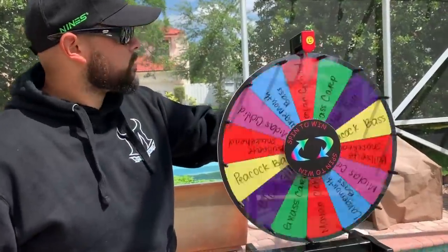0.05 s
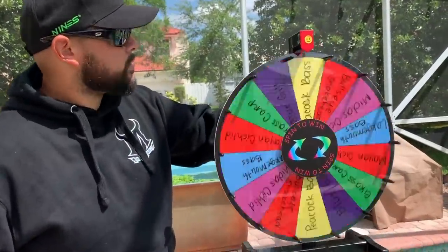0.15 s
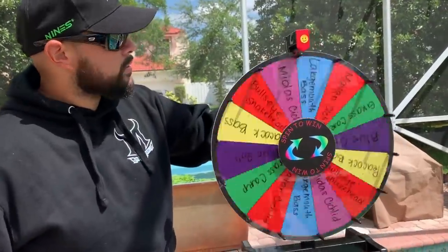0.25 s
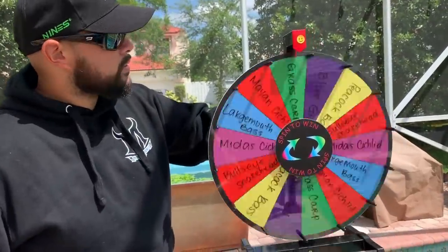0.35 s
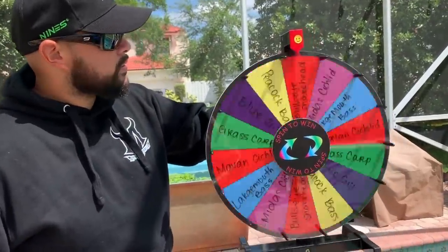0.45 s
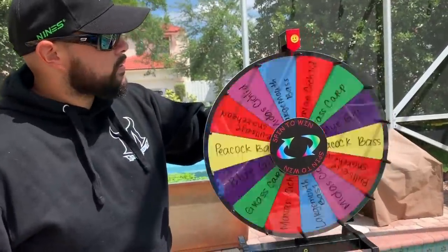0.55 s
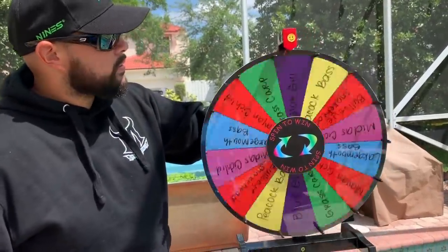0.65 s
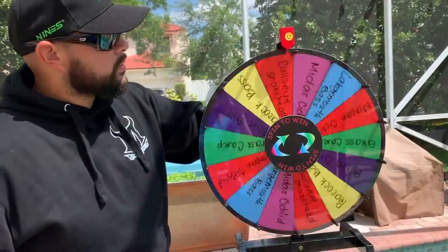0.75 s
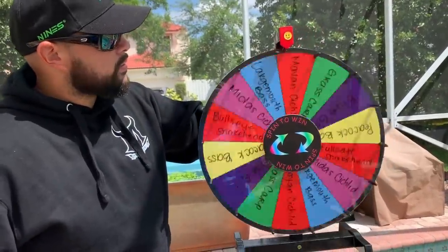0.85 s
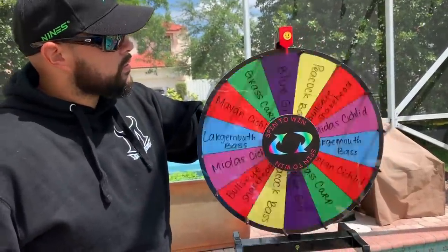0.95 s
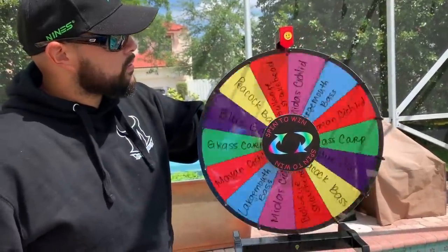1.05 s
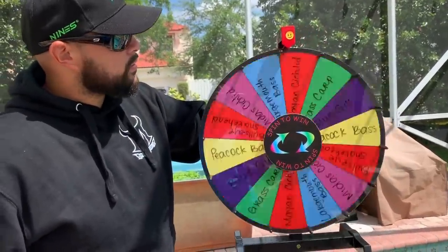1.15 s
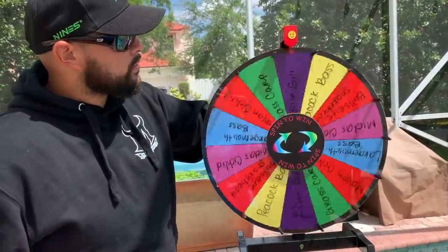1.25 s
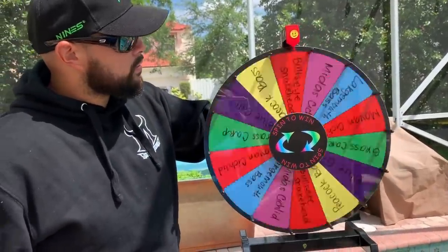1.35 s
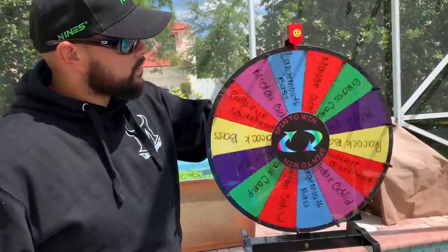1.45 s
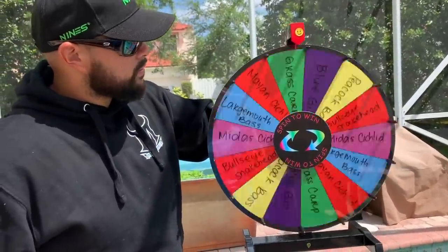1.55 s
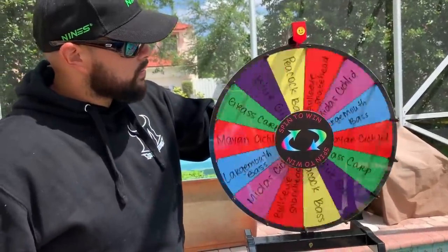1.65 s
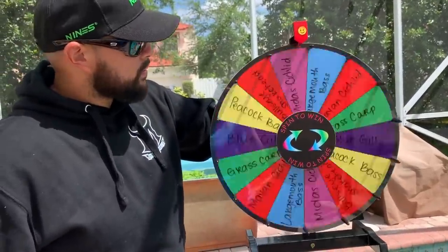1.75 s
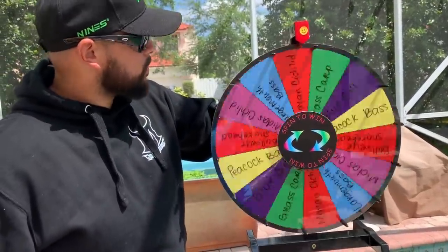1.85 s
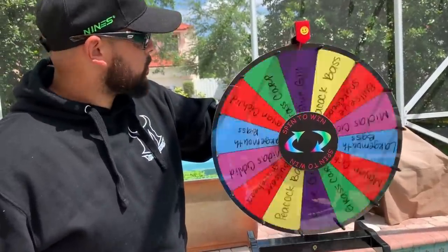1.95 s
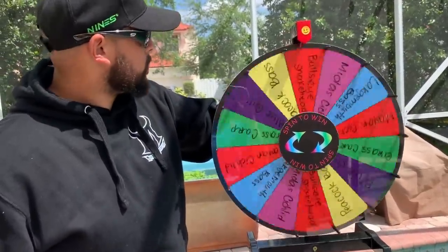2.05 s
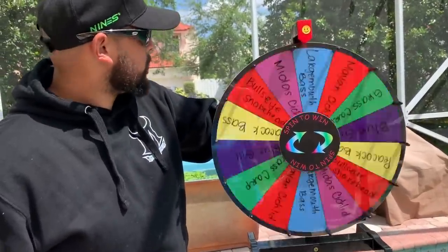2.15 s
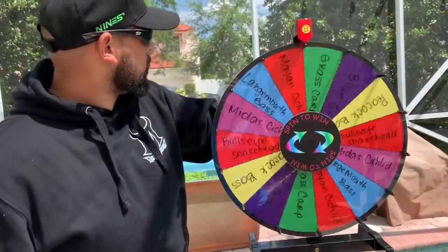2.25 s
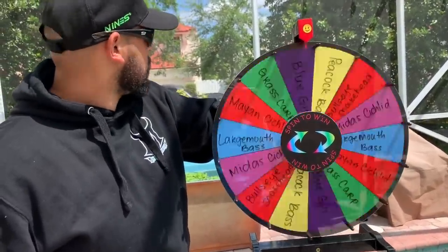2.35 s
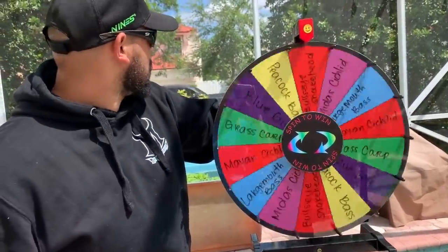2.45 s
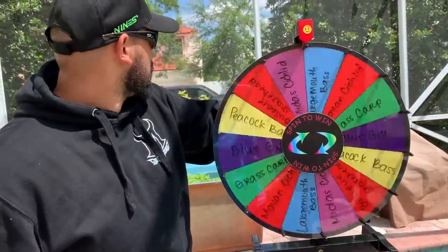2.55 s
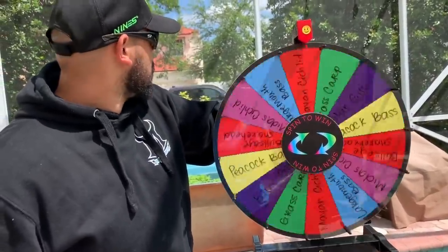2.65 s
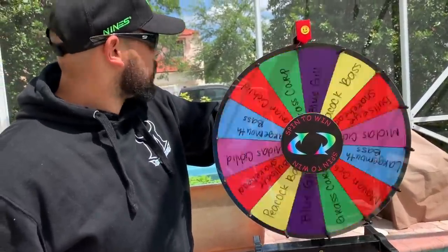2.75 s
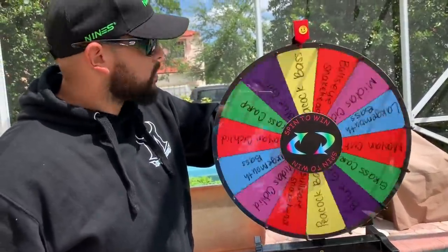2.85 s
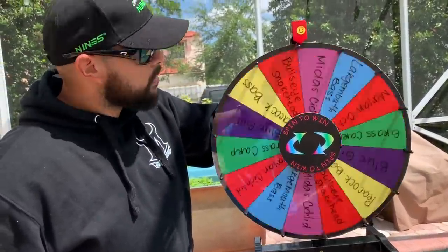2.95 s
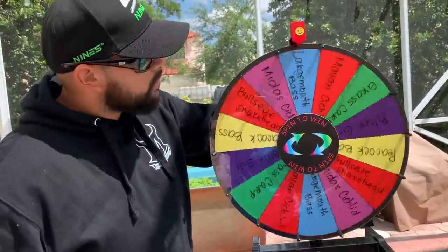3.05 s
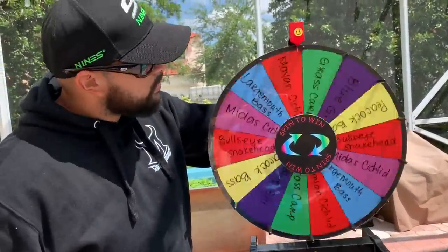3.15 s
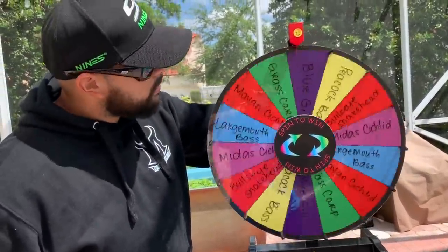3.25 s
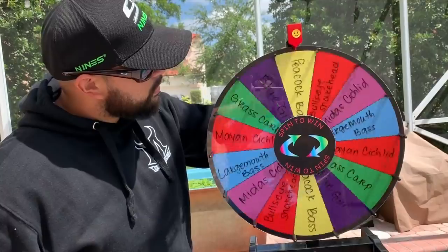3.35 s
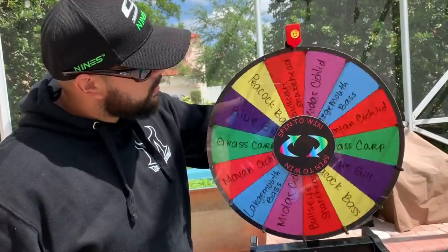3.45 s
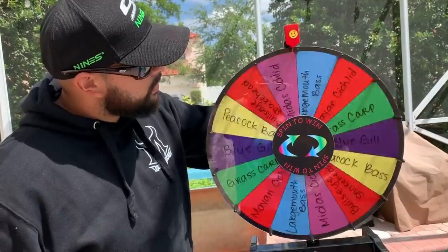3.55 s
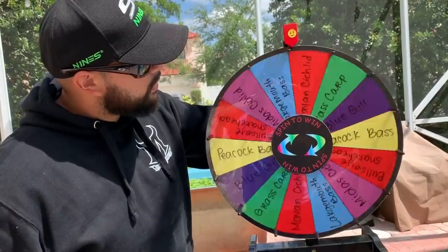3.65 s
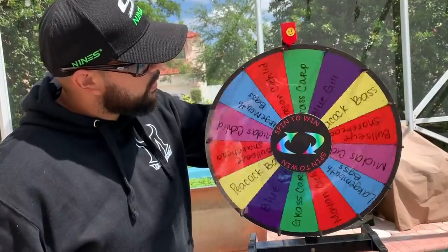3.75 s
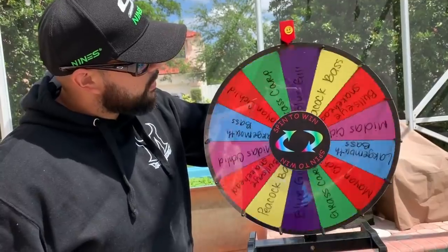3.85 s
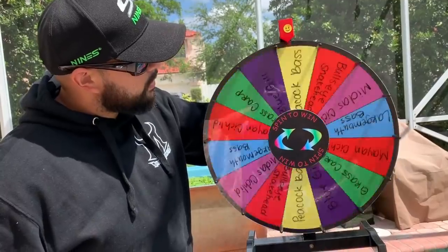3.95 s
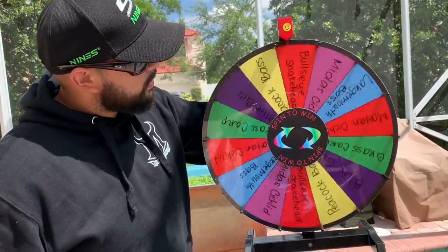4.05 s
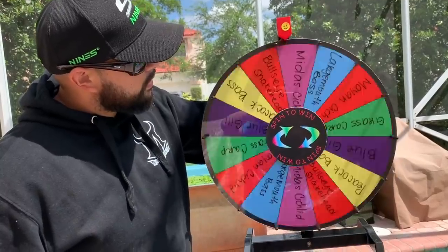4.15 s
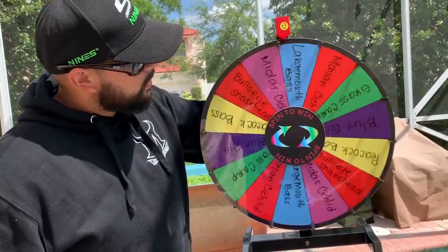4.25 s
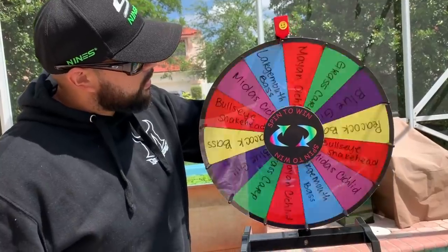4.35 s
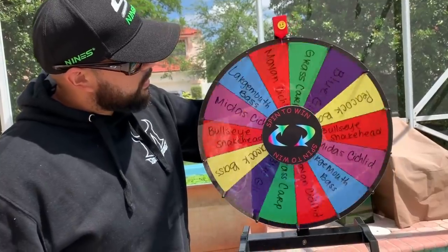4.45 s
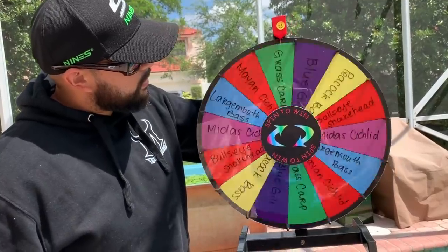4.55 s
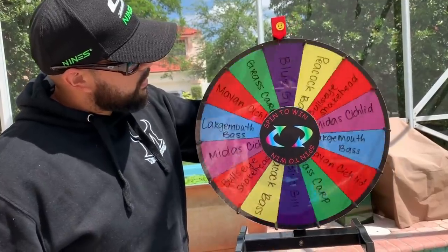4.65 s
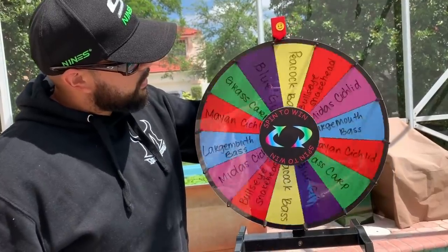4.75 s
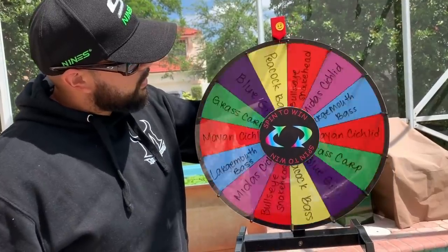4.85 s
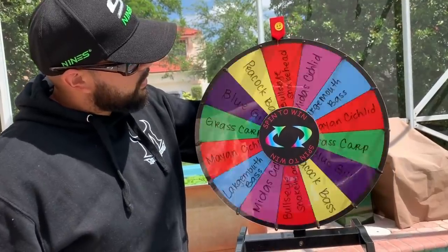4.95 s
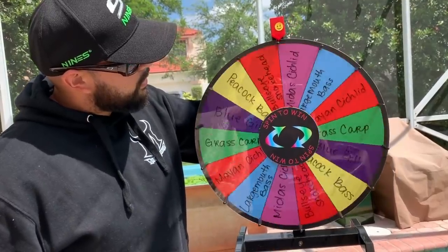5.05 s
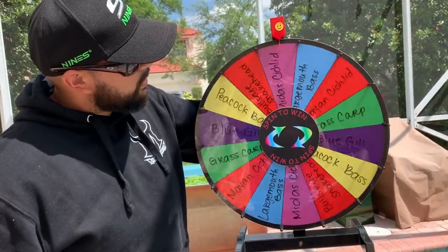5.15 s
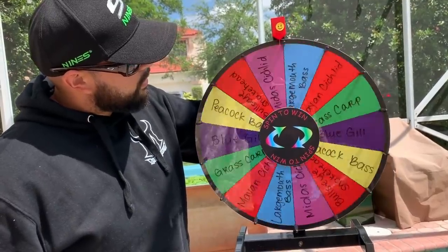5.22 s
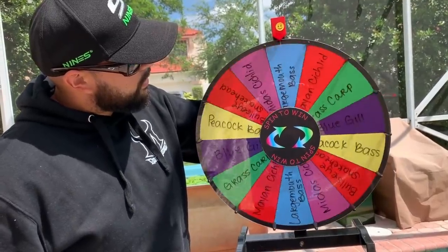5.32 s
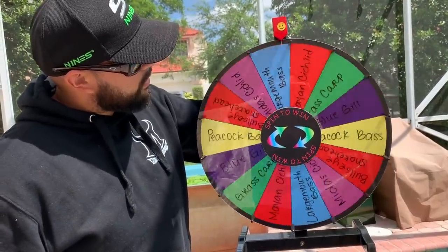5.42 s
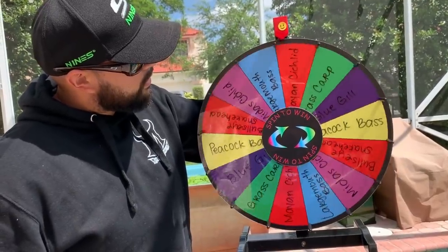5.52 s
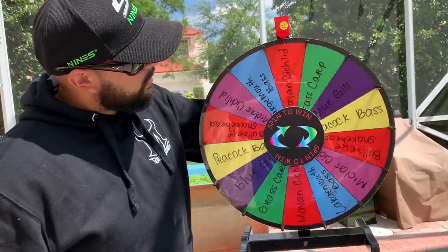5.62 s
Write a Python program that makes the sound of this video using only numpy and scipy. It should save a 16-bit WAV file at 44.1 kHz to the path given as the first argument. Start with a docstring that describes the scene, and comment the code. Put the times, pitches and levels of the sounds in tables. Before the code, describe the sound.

A tabletop prize wheel's pointer ticks rapidly on its pegs, bright and plasticky, gradually slowing to widely spaced single clicks on a quiet patio.

```python
"""Rapid plastic ticks are heard first, spreading out as a tabletop prize wheel coasts to a stop on a patio.
Each peg touches the pointer, bends it and lets go; the pointer snaps back, chatters and rings: noise
bursts drive a broad click and a bank of resonators. The hub adds a low rolling noise.
Behind lie shaped noise for far traffic and leaf hiss, wavering sine tones for a low engine drone,
and gliding, trilled whistles for a faint bird."""
import sys
import numpy as np
from scipy import signal
from scipy.fft import rfft, irfft
from scipy.io import wavfile
from scipy.ndimage import uniform_filter1d

SR = 44100
rng = np.random.default_rng(int(sys.argv[2]) if len(sys.argv) > 2 else 0)


def wav_out(sig):
    """Save sig, one row per channel (or a flat mono array), as 16-bit PCM at SR to the path in sys.argv[1]."""
    wavfile.write(sys.argv[1], SR, np.round(np.clip(np.atleast_2d(sig).T, -1, 1) * 32767).astype(np.int16))


N = 250532

# Pegs releasing the pointer: (time [s], relative snap level [dB], low-, middle- and high-mode
# ring offsets [dB], relative level of the peg's first touch [dB])
PEG_RELEASES = [(0.0251, -26, -7.5, -2, -4, -30.5), (0.0601, -24, -4, 0.5, -2.5, -36),
                (0.0965, -28.5, -0.5, 3.5, 1, -40), (0.131, -25.5, -3.7, -3, -3, -34),
                (0.167, -25.5, -7, -6, -3.0, -34), (0.2033, -24.5, -4.5, 0, -0.5, -41),
                (0.2403, -25.5, -3.5, -3, -2.6, -38), (0.2782, -26.5, -1.5, 0.5, 0, -31),
                (0.3159, -28.5, 0.5, 5, 2, -36), (0.353, -29.5, -0.5, 6, 2.5, -33),
                (0.3907, -26.8, -4.0, 6, -2, -29.5), (0.4301, -27.5, -0.5, 1, 1, -33),
                (0.4681, -27.5, -1.5, 5, 1, -32), (0.5062, -29.5, -1.5, 5, 3, -34),
                (0.5455, -29.5, -0.5, 6.5, 1.5, -32.5), (0.5842, -29.5, 1.5, 3.5, 3, -33),
                (0.6241, -28.5, 1.2, 5.5, 0.5, -37), (0.6627, -29, 1, 7.5, 1, -35),
                (0.7043, -27.5, -1, 3.5, 1, -34), (0.7462, -29.5, 2.5, 5, 4, -36),
                (0.7885, -28, -1.5, 2, 0.5, -33.0), (0.8277, -28.6, 0, 3.5, 2.2, -36),
                (0.8674, -28, 0.5, 3.5, 3, -35.0), (0.9108, -27.5, 0, 1, 2.5, -43),
                (0.953, -26.5, -1.5, 0.8, -1, -33), (0.9941, -30, 2, 2, 5, -34),
                (1.037, -28.5, 1.8, 2.5, 2.5, -35), (1.0806, -30.5, 2.5, 2, 5.5, -33),
                (1.1234, -30, 1.5, 0, 6, -36), (1.168, -30.5, 4.5, 5.5, 5.5, -37.0),
                (1.2119, -28, -1.0, 0, 0.5, -38.0), (1.2571, -27.5, 2.7, 1.5, 2, -38),
                (1.3033, -29, 1.5, 3.5, 5.5, -49), (1.3503, -28.5, 3, -1, 4.5, -55),
                (1.3964, -29, 3.5, 2, 2.7, -53), (1.4436, -29, 2.5, 5, 2, -50),
                (1.4895, -26.5, -2, -1.7, 0.5, -38), (1.5371, -27, -0.5, -0.8, 2.5, -40.0),
                (1.5856, -28, 2, 1, 3, -47), (1.6337, -27.5, 1, 2, 1.5, -43),
                (1.6838, -27.5, 2, -1, 1, -40), (1.7331, -27, 0.3, 0.5, 0, -36.0),
                (1.7835, -26.5, 1.0, -0.1, -1, -35), (1.8356, -28, 1.2, 5, 1, -38),
                (1.8865, -27, -0.0, 3.5, -0.5, -44), (1.9386, -27.5, 1, 3.5, 1, -38),
                (1.9926, -28, 1.9, 3, 2.1, -37.0), (2.0462, -27.5, 1.5, 3, 2, -38),
                (2.0993, -27.5, 2, 3, 0.2, -35), (2.154, -25.5, -0.5, 2, -4, -40),
                (2.2107, -28, 3, 3, 1, -40), (2.267, -29, 2.5, 4, 3.5, -39),
                (2.3239, -29, 4.5, 3, 4.5, -42), (2.3823, -30.5, 5, 5.5, 5.5, -43),
                (2.441, -30.5, 5.2, 7.5, 5, -56), (2.502, -28.5, 2.5, 3.5, 1, -45),
                (2.5627, -27.5, 1.7, 3, -0.2, -45), (2.6243, -27, 0.5, -0.2, 0, -42),
                (2.6881, -26, 0.3, -0.3, -1.9, -38.5), (2.7519, -25, -0.3, -3.5, -3, -35),
                (2.8195, -27, 1.2, 2, -0.3, -41.0), (2.8871, -27, 1.5, -1.3, 1, -37),
                (2.9548, -25.5, -0.2, -2.5, -3, -43), (3.0244, -26.5, -1.5, -2, 0.1, -39.0),
                (3.0936, -27.5, 2.5, -2, 1.7, -41), (3.1644, -27, 0.2, 0.5, 0.2, -41),
                (3.2359, -26, 1, -1, -1, -48.0), (3.3119, -27, 1.3, 2.5, -0.5, -43),
                (3.391, -26.5, -0.9, -0.5, -0.5, -39.5), (3.471, -26, -2, 0, -2, -47),
                (3.5542, -26, -0.3, -1.5, -2.5, -40.5), (3.6404, -26, -0.5, -3.5, -3, -42.5),
                (3.7255, -25.5, 0.5, -4.5, -5.5, -46), (3.8163, -26, -0.5, -4, -3.5, -42),
                (3.9106, -28.5, 2, 2.5, 3.5, -44), (4.0084, -26.5, -0.5, -1.5, -0.8, -47.0),
                (4.1075, -27, 0.3, 0.5, 0, -43), (4.2129, -27, 1, -2, 1.2, -46.5),
                (4.3226, -26, -0.5, -5, 0, -45), (4.437, -27, 3, 3, -1, -46),
                (4.5585, -26, 2.1, 3.5, -3, -48.0), (4.6855, -27.5, 1.3, 5.5, 0.5, -45),
                (4.8232, -27.5, 1.9, 5, 0.5, -45), (4.9785, -29, 3, 6.5, 3, -46),
                (5.1485, -27, 2, 4.5, -3.5, -55), (5.3479, -29, 5, 6, -0.5, -56),
                (5.5964, -31.0, 8, 7, 4.5, -57)]
# Where in a gap the next peg meets the pointer: (gap between ticks [s], share of gap elapsed [0-1])
TOUCH_POSITIONS = [(.036, .69), (.08, .73), (.14, .735), (.2, .715), (.25, .68)]
# Resonances of the pointer: (nominal frequency [Hz], level over the snap before offsets [dB], T60 [s])
POINTER_MODES = [(1115, -20.5, 0.0047), (1771, -13.5, 0.06), (1833.7, -8.5, 0.033), (4030, -9.5, 0.048),
                 (4328, -10, 0.01), (6940, -11.5, 0.019), (7524, -6, 0.013), (7670, -5.5, 0.0073),
                 (9410, -10.5, 0.0027), (13000, -7, 0.003)]
# Centres of the low, middle and high mode groups: frequency [Hz]
MODE_GROUP_CENTRES = [1800, 4100, 7600]
# Spectrum of the bare contact: (frequency [Hz], relative level per Hz [dB])
SNAP_SPECTRUM = [(80, -15.5), (180, -2), (350, 3.5), (520, -8), (780, -3.5), (1400, -9), (2300, -16),
                 (3000, -6.5), (4800, 6), (5900, -0.5), (6800, -1), (8600, -1), (9700, 3), (11300, -7),
                 (13300, -1), (15700, -5)]
# Mean phase by which the left channel leads the right: (frequency [Hz], phase [rad])
CHANNEL_PHASE = [(2950, 0.04), (3250, 2.81), (3950, 0.93), (4400, 1.65), (4950, 3.09), (5600, 3.26),
                 (6500, 4.88), (7900, 6.19), (8950, 6.4), (10750, 9.28), (12400, 9.59), (12950, 10.75),
                 (14400, 12.54)]
# Left-right likeness of the wheel, which sets its phase flutter: (frequency [Hz], likeness [0-1])
WHEEL_LIKENESS = [(200, 0.99), (700, 0.54), (1400, 1), (2100, 1), (2900, 0.16), (4000, 0.98), (5300, 0.92),
                  (6200, 0.59), (8300, 0.84), (10000, 0.46), (11400, 1), (13500, 0.52), (14800, 0.98)]
# Spectrum of the outdoor background: (frequency [Hz], relative level per Hz [dB])
YARD_SPECTRUM = [(20, -77), (35, -57.5), (44, -65), (60, -54), (100, -62.5), (135, -59), (200, -69.5),
                 (330, -71.5), (600, -75.5), (1100, -78.5), (2200, -87.5), (4500, -95), (9000, -107),
                 (15000, -113)]
# Left-right likeness of the background: (frequency [Hz], likeness [0-1])
BACKGROUND_LIKENESS = [(100, 1), (250, 1), (600, 0.54), (1000, 0.38), (1800, 0.82), (3000, 0.04),
                       (15000, 0)]
# Swell of far motors: (time [s], relative level of lowest engine tone [dB], relative rumble level [dB])
MOTOR_SWELL = [(0.0, -40, -43), (0.08, -56, -43), (0.22, -47, -31), (0.32, -64, -44), (0.46, -30, -36),
               (0.57, -61, -48), (0.65, -48, -37.5), (1.06, -50, -32.5), (1.17, -37.5, -40),
               (1.87, -34.5, -41), (2.12, -54, -42), (2.34, -48, -41), (2.59, -53, -33), (2.67, -46, -28.5),
               (2.75, -31, -42), (2.86, -40, -36), (3.45, -41, -40), (3.51, -32.5, -42), (3.65, -48, -48),
               (3.76, -42, -41), (3.86, -34, -33), (4.33, -44.5, -45), (4.43, -38.5, -38), (5.52, -47, -32),
               (5.58, -54, -41), (5.68, -53, -29)]
# Tones of the engine: (mean frequency [Hz], rms level [dB])
ENGINE_TONES = [(53.5, -42), (86, -44), (309, -53.5), (514, -61.5)]
# Far bird notes: (time [s], length [s], first frequency [Hz], last frequency [Hz], relative level [dB])
BIRD_NOTES = [(3.412, .06, 2700, 2980, -51), (3.58, 0.082, 2450, 2390, -48.5),
              (3.688, 0.032, 3030, 3610, -46.5), (3.746, 0.047, 2900, 3580, -48),
              (3.847, 0.053, 2480, 2520, -46), (5.38, 0.1, 3100, 3270, -55), (5.40, 0.066, 2840, 2830, -53),
              (5.497, .035, 2810, 2470, -52), (5.523, .07, 2420, 2400, -54)]
# Channel balance: (frequency [Hz], left minus right level [dB])
CHANNEL_BALANCE = [(70, -.2), (300, -3), (650, -3), (1100, 1), (1500, 0), (3000, 0), (3900, 2), (4800, 0)]

EDGE_HZ = 16000  # upper band limit
LEAD_S = .003  # time the pointer scrapes along the peg before it lands
TICK_SAMPLES = 8192


def gain_of(db):
    """Level definition: an amplitude ratio is ten to the power dB / 20."""
    return 10 ** (np.asarray(db) / 20)


def evened(x):
    """Mean-power normalisation: the rms becomes 1."""
    return x / np.sqrt(np.mean(x ** 2) + 1e-20)


def unit(x):
    """Energy normalisation: the sum of squares becomes 1."""
    return x / (np.linalg.norm(x) + 1e-12)


def read(points, hz):
    """Linear interpolation on a logarithmic frequency axis."""
    f, value = np.transpose(points)
    return np.interp(np.log(hz + 1), np.log(f + 1), value)


def add(mix, s, sound):
    """Superposition: adds a sound to the mix at time s [s], trimmed at both ends."""
    start = round(s * SR)
    sound = sound[max(-start, 0):]
    part = mix[max(start, 0):][:len(sound)]
    part += sound[:len(part)]


def drift(rate_hz):
    """Low-pass filtered noise: a slow random wander of rms 1."""
    hz = np.fft.rfftfreq(N, 1 / SR)
    spectrum = rfft(rng.standard_normal(N)) * np.exp(-(hz / rate_hz) ** 2)
    return evened(irfft(spectrum, N))


def minimum_phase(points):
    """Minimum-phase principle: the Hilbert transform of log gain gives the most compact causal click."""
    hz = abs(np.fft.fftfreq(TICK_SAMPLES, 1 / SR))
    log_gain = np.log(gain_of(read(points, hz)))
    return np.exp(np.conj(signal.hilbert(log_gain)))[:TICK_SAMPLES // 2 + 1]


def chatter(bounce_s, loss_db, contact_s, scrape_db, count=8):
    """Repeated lossy impact: force spectrum of a scrape, a landing at LEAD_S and weakening bounces."""
    t = np.arange(TICK_SAMPLES // 4) / SR - LEAD_S
    gaps = bounce_s * np.exp(.11 * rng.standard_normal(count))
    sizes = gain_of(-loss_db * np.arange(count) + 1.3 * rng.standard_normal(count))
    landings = np.cumsum(gaps) - gaps[0]
    age = t - landings[:, None]
    contacts = sizes @ ((age >= 0) * np.exp(-abs(age) / contact_s))
    scrape = gain_of(scrape_db) * np.exp(-abs(t) / .0018)
    return rfft((contacts + scrape) * rng.standard_normal(len(t)), TICK_SAMPLES)


def scatter(wet_db, t60, shade_hz=12000, late_db=-22, late_t60=0.31):
    """Multiple reflection: a treble-shaded direct path plus dense echoes off disc, stand and patio."""
    t, hz = np.arange(TICK_SAMPLES) / SR, np.fft.rfftfreq(TICK_SAMPLES, 1 / SR)
    direct = 1 / (1 + 1.3j * hz / shade_hz - (hz / shade_hz) ** 2)  # second-order low-pass
    decay = gain_of(-60 * t / t60) + gain_of(late_db - 60 * t / late_t60)
    build_up = 1 - np.exp(-(t / 0.0043) ** 2)
    echoes = unit(decay * build_up * rng.standard_normal(len(t)))
    return direct + gain_of(wet_db) * rfft(echoes)


def strike(force, colour, ring_db, load=1, detune=0.0089):
    """Modal superposition: a broad snap plus randomly detuned modes; a load factor below 1 lowers the low ones."""
    hz, db, t60 = np.transpose(POINTER_MODES)
    db = db + np.interp(hz, MODE_GROUP_CENTRES, ring_db)
    low = hz < np.mean(MODE_GROUP_CENTRES[:2])
    hz = hz * np.where(low, load, 1) * (1 + detune * rng.standard_normal(len(hz)))
    sound = unit(irfft(force * colour * scatter(wet_db=1.5, t60=.11)))
    high_drive = irfft(force * scatter(wet_db=-2, t60=.11))
    low_drive = irfft(force * scatter(wet_db=0, t60=0.096))  # low modes spread through the whole disc
    for f, level_db, decay_s, is_low in zip(hz, db, t60, low):
        radius = np.exp(-np.log(1000) / (decay_s * SR))  # pole radius for the wanted T60
        poles = [1, -2 * radius * np.cos(2 * np.pi * f / SR), radius ** 2]
        ring = signal.lfilter([1, 0, -1], poles, low_drive if is_low else high_drive)
        sound += gain_of(level_db) * unit(ring)
    return sound


def wheel(snap_db=30, touch_db=27, fast_loss_db=1.6, loss_growth_db=0.9):
    """Elastic release: each peg touches the pointer late in the gap, then frees it with a chattering snap."""
    out, colour = np.zeros(N), minimum_phase(SNAP_SPECTRUM)
    rows = np.array(PEG_RELEASES)
    first_gap = rows[1, 0] - rows[0, 0]
    earlier = [rows[0, 0] - first_gap, *rows[0, 1:]]  # the wheel is already turning
    rows = np.vstack([earlier, rows])
    gaps = np.diff(rows[:, 0], prepend=rows[0, 0] - first_gap)
    for (s, db, *ring_db, soft_db), gap in zip(rows, gaps):
        # a fast wheel keeps the pointer bouncing: less loss per bounce
        loss_db = fast_loss_db + loss_growth_db * np.log2(gap / first_gap)
        release = chatter(bounce_s=.0032, loss_db=loss_db, contact_s=.0008, scrape_db=-15.5)
        add(out, s - LEAD_S, gain_of(db + snap_db) * strike(release, colour, ring_db))

        touch = chatter(bounce_s=.0012, loss_db=4, contact_s=.0006, scrape_db=-14)
        touch_s = s - gap * (1 - np.interp(gap, *np.transpose(TOUCH_POSITIONS)))
        touch_sound = strike(touch, colour, ring_db=[-1, 0, -5], load=.85)
        add(out, touch_s - LEAD_S, gain_of(soft_db + touch_db) * touch_sound)
    return out


def widened(x, spread=0.85):
    """Interchannel phase: left and right differ by frequency, with a random flutter that widens the image."""
    hz, _, z = signal.stft(x, SR, nperseg=256, noverlap=192)
    likeness = np.clip(read(WHEEL_LIKENESS, hz), .05, 1)
    flutter = spread * np.sqrt(-2 * np.log(likeness))[:, None]  # less alike, more flutter
    chance = uniform_filter1d(rng.standard_normal(z.shape), size=3, axis=0)  # over frequency
    chance = evened(uniform_filter1d(chance, size=4, axis=1))  # over time
    phase = read(CHANNEL_PHASE, hz)[:, None] + flutter * chance
    turn = np.exp(.5j * phase)  # half to each side
    return signal.istft(z * np.array([turn, 1 / turn]), SR, nperseg=256, noverlap=192)[1][:, :N]


def band_noise(order, low_hz, high_hz):
    """Band-pass filtering: white noise confined to one band, with rms 1."""
    band = signal.butter(order, [low_hz, high_hz], "band", fs=SR, output="sos")
    return evened(signal.sosfilt(band, rng.standard_normal(N)))


def bearing(low_hz=135, high_hz=240, level_db=-48.5, fall_db=2):
    """Rolling noise: the hub's low band weakens by fall_db each time the speed halves."""
    s = np.array(PEG_RELEASES)[:, 0]
    halvings = np.log2(np.diff(s) / (s[1] - s[0]))
    slowing = np.interp(np.arange(N) / SR, s[1:], halvings)
    return gain_of(level_db - fall_db * slowing) * band_noise(2, low_hz, high_hz)


def yard(level_db=-1, swell_db=2.3):
    """Partial coherence: traffic rumble and leaf hiss share their noise between the sides, fully in the bass."""
    hz = np.fft.rfftfreq(N, 1 / SR)
    a, b = rfft(rng.standard_normal((2, N)))
    same = np.clip(read(BACKGROUND_LIKENESS, hz), 0, 1)
    right = same * a + np.sqrt(1 - same ** 2) * b
    z = np.array([a, right]) * gain_of(read(YARD_SPECTRUM, hz) + level_db)
    return irfft(z, N) * np.sqrt(SR / 2) * gain_of(swell_db * drift(1.5))  # sqrt: level per Hz to amplitude


def rumble(low_hz=64, high_hz=116, level_db=-3.5):
    """Amplitude-modulated band noise: the low roll of far traffic comes and goes."""
    s, _, db = np.transpose(MOTOR_SWELL)
    swell_db = np.interp(np.arange(N) / SR, s, db)
    return gain_of(swell_db + level_db) * band_noise(3, low_hz, high_hz)


def drone(waver=0.00566, throb=0.72):
    """Frequency and amplitude modulation: a far engine's tones waver in pitch and swell in level."""
    s, db, _ = np.transpose(MOTOR_SWELL)
    out = np.zeros(N)
    for k, (tone_hz, tone_db) in enumerate(ENGINE_TONES):
        turns = np.cumsum(tone_hz * (1 + waver * drift(5.42))) / SR
        if k == 0:  # the lowest tone follows the table
            swell = gain_of(np.interp(np.arange(N) / SR, s, db))
        else:
            swell = 1 + throb * drift(1.6)
        out += gain_of(tone_db) * evened(swell * np.sin(2 * np.pi * turns))
    return out


def bird(trill_hz=36, trill_depth=0.044, echo_t60=0.41):
    """Frequency modulation and reverberation: gliding, trilled whistles are blurred by the garden."""
    out = np.zeros(N)
    for s, length, first_hz, last_hz, db in BIRD_NOTES:
        t = np.arange(0, length, 1 / SR)
        glide = np.linspace(first_hz, last_hz, len(t))
        hz = glide * (1 + trill_depth * np.sin(2 * np.pi * trill_hz * t))
        whistle = np.sin(2 * np.pi * np.cumsum(hz) / SR)
        add(out, s, gain_of(db) * whistle * signal.windows.tukey(len(t), .5))
    t = np.arange(TICK_SAMPLES) / SR
    echo = unit(gain_of(-60 * t / echo_t60) * rng.standard_normal(len(t)))
    return .45 * out + 1.1 * signal.fftconvolve(out, echo)[:N]


def scene():
    """Linear superposition: the wheel up close, the outdoors behind it."""
    return widened(wheel()) + bearing() + yard() + rumble() + drone() + bird()


def record(dry):
    """Linear filtering: a slight channel imbalance by frequency, then a low-pass band limit."""
    lean_db = read(CHANNEL_BALANCE, np.fft.rfftfreq(N, 1 / SR)) / 2
    heard = irfft(rfft(dry) * gain_of([lean_db, -lean_db]), N)
    lowpass = signal.firwin(511, EDGE_HZ, window=("kaiser", 8), fs=SR)
    return signal.oaconvolve(heard, lowpass[None], "same", axes=1)


dry = scene()
out = record(dry)
wav_out(out)
```